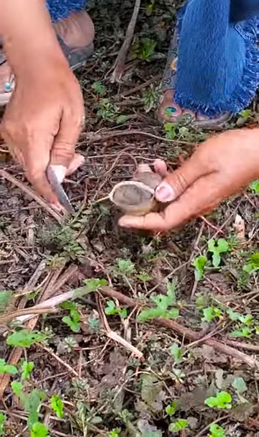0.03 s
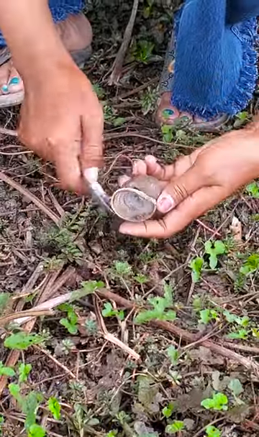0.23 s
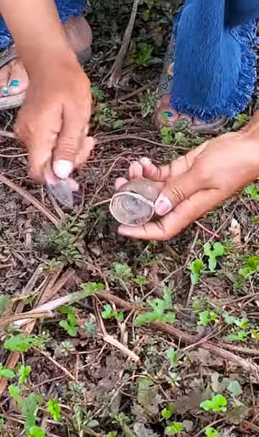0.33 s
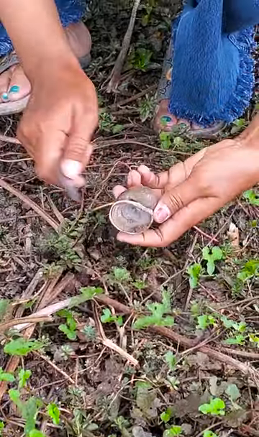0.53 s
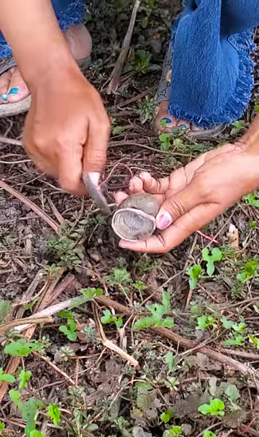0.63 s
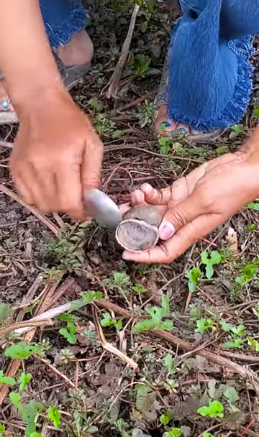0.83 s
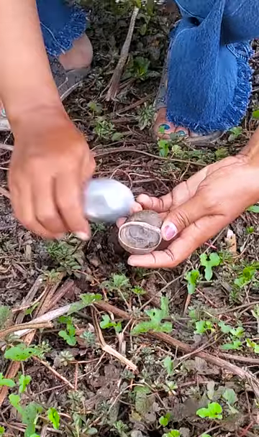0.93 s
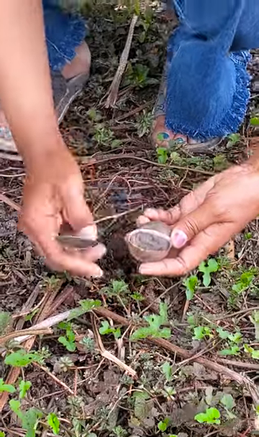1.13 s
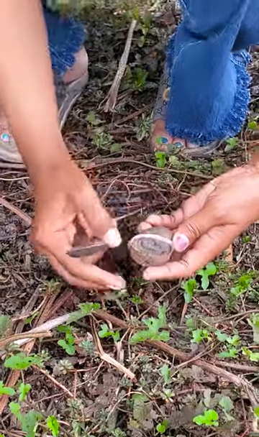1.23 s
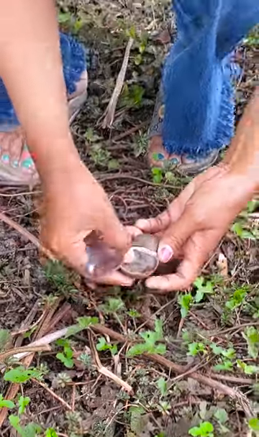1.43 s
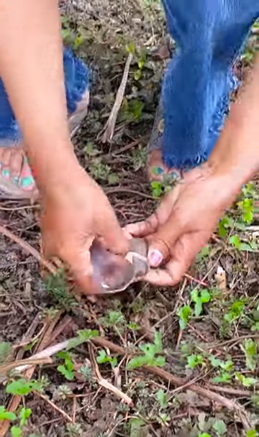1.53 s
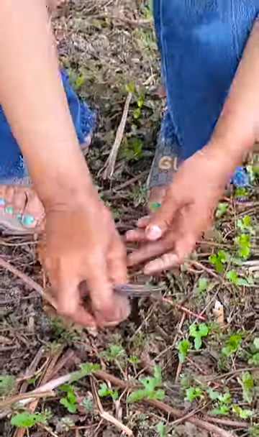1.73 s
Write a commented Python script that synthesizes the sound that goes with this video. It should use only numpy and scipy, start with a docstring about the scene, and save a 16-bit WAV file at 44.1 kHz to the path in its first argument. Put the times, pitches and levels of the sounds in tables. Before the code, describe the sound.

Five quick, dry clicks of a metal spoon on a large snail shell, the last three loudest, some with tiny rebounds. Then come faint finger ticks and light clothing rustle, heard up close outdoors over a quiet rumble.

```python
"""A metal spoon, gripped in the fist, taps a large snail shell held in the other hand, outdoors near the ground.
Five sharp taps, some with light rebounds, ring the shell and the spoon for a few milliseconds.
Behind them: a low rumble, a faint hiss, one far bird and a rustle that grows as the hands move down."""
import sys
import numpy as np
from scipy import signal
from scipy.fft import rfft, irfft
from scipy.io import wavfile
from scipy.ndimage import uniform_filter1d

SR = 44100
rng = np.random.default_rng(int(sys.argv[2]) if len(sys.argv) > 2 else 0)


def unload_wav(signal):
    """Save mono or channel-first audio to the path in sys.argv[1] as 16-bit WAV at rate SR, clipped to [-1, 1]."""
    wavfile.write(
        sys.argv[1],
        SR,
        np.round(np.clip(np.atleast_2d(signal).T, -1, 1) * 32767).astype(np.int16),
    )


N = 79380

# spoon meets shell: (s, level dB, clack Hz, hollow body dB, shell ping dB, spoon clink dB, clink t60 s, treble dB, grit dB, echo delay s)
TAPS = [(0.2336, -23.5, 3630, 6, -24, 1, 0.042, 25.5, 3, .00178), (0.2463, -44.5, 3400, 5, 13, -13, 0.049, 22, 12, .00178),
        (0.2536, -44.5, 5000, 6, 5, 18, 0.061, 26, 7, .00178),
        (0.399, -14, 3480, 8.5, -2.5, 2, 0.053, 10, -1.5, .0014), (0.4078, -27, 3350, 9, -1, -16, 0.051, 9, 2, .0014),
        (0.5822, -3, 3240, 0, 1, 3, 0.025, 3.5, -3.5, 0.0016),
        (0.767, -1.5, 3470, -3, -1.5, 2, 0.014, -2.5, -4.5, .00173), (0.825, -49.5, 3700, -3, -6, 9, .02, 2, -1, .00173),
        (0.9743, -3, 4770, -5.5, -3.5, 8, 0.013, 9, -3, .00141), (1.0233, -43.5, 3900, -21, 14, 10, 0.026, 13, 10, .0011),
        (1.035, -26, 4900, -30, 13.5, 5, .018, 18.5, -6, .0011), (1.0379, -21, 5160, -22, -10, -6, 0.019, 18, -1, .0011)]
# hand-damped shell: (Hz, dB, t60 s, left-right dB)
SHELL = [(700, -28, 0.021, -1.5), (1166, -29.5, 0.005, -7.5), (1663, -19.5, 0.0135, -0.5), (2426, -22, 0.029, 0),
         (2958, -12.5, 0.018, 11), (3382, -13.5, 0.015, -7.5), (3758, -12.5, .011, -6.5)]
# gripped spoon: (Hz, dB, t60 s, left-right dB)
SPOON = [(4830, -21, 0.016, -10.5), (4924, -10.5, 0.018, 0), (5590, -20.5, 0.046, -4), (6570, -19, 0.013, 15.5),
         (7296, -26, .012, 4.5), (7920, -31, 0.019, 15), (9220, -34.5, .011, -10), (11250, -34, 0.024, 0.5),
         (12700, -28, 0.0083, -12), (14040, -38.5, .013, -4.5), (15550, -44, 0.01613, 7)]
BODY_HZ, PING_HZ, CLINK_HZ, MODE_OCTAVES, TREBLE_HZ = 2182, 2955, 4975, 0.064, 8070
# gritty crack of the contact: (Hz, dB per Hz)
GRIT = [(200, -53.5), (420, -48), (600, -20.5), (720, -19.5), (950, -20.5), (1250, -13.5), (1700, -10.5), (2050, -9.5), (2800, -3.5), (3700, -1.5), (5500, -5), (7600, -5), (9000, -23), (12000, -25.5), (15500, -22)]
GRIT_DB, GRIT_T60_S, GRIT_RISE_S = -10, 0.026, 0.00017
SCATTER_DB, SCATTER_T60_S, SCATTER_RISE_S, SCATTER_DULL_HZ = -32.5, 0.099, 0.0027, 7070   # off plants and legs
RIGHT_LAG_S = .000072
# small ticks of fingers and shell: (s, level dB, t60 s)
TICKS = [(1.1495, -47, 0.017), (1.1722, -48.5, 0.014), (1.544, -53, 0.1)]
TICK_COLOUR = [(1000, -31.5), (4000, 2), (7000, 5), (10000, -6), (15500, 6.5)]
# far bird: (s, Hz, dB)
BIRD = [(.452, 5500, -78), (.465, 5100, -61), (.477, 4200, -56), (.492, 4050, -63), (.502, 3350, -71), (.532, 3300, -67), (.542, 2900, -85)]
RUMBLE = [(12, -63.5), (20, -32), (59, -4.5), (80, -2.5), (110, -5.5), (129, -12), (152, -13.5), (173, -22.5), (275, -29.5),
          (400, -44.5), (520, -67), (880, -120)]
RUMBLE_LEVEL = [(0.0, -50.5), (0.194, -48.5), (0.214, -51), (0.586, -54), (0.61, -46), (0.696, -54), (0.732, -46),
                (0.786, -55), (1.118, -52), (1.158, -43.5), (1.218, -63.5), (1.242, -50), (1.634, -54), (1.684, -47.5),
                (1.778, -56.5), (1.8, -46)]   # (s, dB)
AIR = [(200, 5.5), (450, -5), (700, 0.5), (950, -5), (1280, 0.5), (1700, -5.5), (3000, -4), (4500, -11), (7300, -7.5), (8600, -29), (10500, -23.5), (12500, -17.5), (15800, -18.5)]
AIR_DB = -62
RUSTLE = [(250, -4), (700, 0), (1400, 2), (2300, -1.5), (4000, -3.5), (7300, -3), (8600, -25), (13000, -10.5), (15800, -12)]
RUSTLE_LEVEL = [(0, -86), (1.15, -85), (1.37, -65), (1.47, -70.5), (1.58, -63), (1.69, -65), (1.8, -58)]   # (s, dB)
CUTOFF_HZ = 16000   # fixed
T = np.arange(N) / SR
ECHO_DB = -11   # off the ground; its delay changes as the hands move
BIRD_WIDTH_HZ = 850   # fixed
CLACK_DB, CLACK_RISE_S = -2, 0.00051   # the stiff shell wall gives and springs back within a millisecond
CLACK_PAN_DB, CLACK_PAN_HZ = -8.5, 3716   # left-right dB per octave, and the pitch that sits in the middle
# the spoon skids over the shell after the third tap: (s, dB)
SKID_LEVEL = [(.592, -70), (.599, -32), (.606, -41.5), (.611, -44.5), (.621, -52.5), (.634, -78)]
SKID = [(1000, -28), (2000, -15.5), (2450, 0.5), (3900, 0), (4500, -11), (5700, -8.5), (7000, -20), (9000, -32.5), (15500, -33.5)]   # (Hz, dB per Hz)
SKID_ROUGH_DB = 0.5
PEAK_LIMIT = .93   # fixed


def from_db(db):
    """Decibels to gain."""
    return 10 ** (np.asarray(db) / 20)


def curve(rows, column=1):
    """One column of a table, joined by straight lines in time."""
    rows = np.array(rows)
    return np.interp(T, rows[:, 0], rows[:, column])


def noise(spectrum, side_db, size=N, colour=None):
    """Stereo noise of rms 1 with the given spectrum, then tinted by an optional gain per Hz."""
    hz, (knots, db) = np.maximum(np.arange(size // 2 + 1) * SR / size, 1), np.transpose(spectrum)
    gain = from_db(np.interp(np.log(hz), np.log(knots), db)) / np.sqrt((1 + (hz / knots[-1] / 1.2) ** 12) * (1 + (knots[0] / hz / 2) ** 4))  # fixed
    gain = gain / np.sqrt(np.mean(gain ** 2)) * (1 if colour is None else colour(hz))
    mid, side = irfft(rfft(rng.standard_normal((2, size))) * gain, size)
    width = from_db(side_db)
    return (mid + width * side * np.array([[1], [-1]])) / np.sqrt(1 + width ** 2)


def decay(t, t60):
    """Exponential fade."""
    return np.exp(-np.log(1000) * t / t60)


def delay(x, s):
    """One channel, read s seconds late."""
    return np.interp(T - s, T, x, left=0)


def add(out, s, sound):
    """Mix a sound in at time s."""
    start = int(s * SR)
    out[:, start:start + sound.shape[1]] += sound[:, :N - start]


def tap(clack_hz, body_db, ping_db, clink_db, clink_t60, treble_db, grit_db):
    """One contact: a short clack, shell and spoon modes, grit and a faint scatter; a looser grip lets the spoon ring longer."""
    t = T[:SR // 5]  # fixed

    def colour(hz):
        """Gain per Hz for this contact."""
        return from_db(body_db / (1 + (hz / BODY_HZ) ** 10) + treble_db / (1 + (TREBLE_HZ / hz) ** 5))

    def near(hz, centre_hz):
        """1 at a resonance, 0 away from it."""
        return np.exp(-(np.log2(hz / centre_hz) / MODE_OCTAVES) ** 2)
    sides, rise = np.array([[.5], [-.5]]), t / CLACK_RISE_S
    clack = from_db(CLACK_DB + CLACK_PAN_DB * np.log2(clack_hz / CLACK_PAN_HZ) * sides) * (rise * np.exp(1 - rise)) ** 2 * np.sin(2 * np.pi * clack_hz * t)
    ring = 0
    for hz, db, t60, pan_db in SHELL + SPOON:
        clink = near(hz, CLINK_HZ)
        strength = colour(hz) * from_db(db + ping_db * near(hz, PING_HZ) + clink_db * clink + pan_db * sides)
        envelope = (1 - np.exp(-rise ** 2)) * decay(t, t60 + clink * (clink_t60 - t60))
        ring = ring + strength * envelope * np.sin(2 * np.pi * hz * t)
    grit = noise(GRIT, side_db=-4, size=len(t), colour=colour) * decay(t, GRIT_T60_S) * (1 - np.exp(-t / GRIT_RISE_S))
    scatter = noise(GRIT, side_db=-1, size=len(t), colour=lambda hz: colour(hz) / np.hypot(1, hz / SCATTER_DULL_HZ))
    scatter = scatter * decay(t, SCATTER_T60_S) * (1 - np.exp(-t / SCATTER_RISE_S))
    return clack + ring + from_db(GRIT_DB + grit_db) * grit + from_db(SCATTER_DB) * scatter


def spoon_on_shell():
    """All contacts, each with its echo off the ground; they reach the left side first."""
    out = np.zeros((2, N))
    for s, db, *tint, echo_s in TAPS:
        sound = from_db(db) * tap(*tint)
        add(out, s, sound)
        add(out, s + echo_s, from_db(ECHO_DB) * sound)
    return np.array([out[0], delay(out[1], RIGHT_LAG_S)])


def handling():
    """Tiny bright ticks, and the rustle of moving arms and clothes."""
    out, t = from_db(curve(RUSTLE_LEVEL)) * noise(RUSTLE, side_db=-2), T[:SR // 10]
    for s, db, t60 in TICKS:
        add(out, s, from_db(db) * decay(t, t60) * noise(TICK_COLOUR, side_db=0.5, size=len(t)))
    return out


def bird():
    """One faint falling chirp, blurred by distance into a narrow band of noise."""
    blur = signal.sosfilt(signal.butter(2, BIRD_WIDTH_HZ / 2, fs=SR, output="sos"), rng.standard_normal((2, N)))
    phase = 2 * np.pi * np.cumsum(curve(BIRD)) / SR
    chirp = (blur[0] * np.sin(phase) + blur[1] * np.cos(phase)) / (np.sqrt(2) * blur.std())
    return from_db(curve(BIRD, column=2)) * chirp * (T > BIRD[0][0]) * (T < BIRD[-1][0])


def outdoors():
    """Uneven low rumble under a steady soft hiss."""
    return from_db(curve(RUMBLE_LEVEL)) * noise(RUMBLE, side_db=-19.0) + from_db(AIR_DB) * noise(AIR, side_db=2.0)


def skid():
    """A short, soft scrape that catches unevenly on the shell's ridges."""
    catch = uniform_filter1d(rng.standard_normal(N), size=40)
    level_db = curve(SKID_LEVEL) + SKID_ROUGH_DB * catch / catch.std()
    return from_db(level_db) * noise(SKID, side_db=-0.5) * (T > SKID_LEVEL[0][0]) * (T < SKID_LEVEL[-1][0])


def scene():
    """Everything at the microphones."""
    return spoon_on_shell() + skid() + handling() + bird() + outdoors()


def record(dry):
    """Peaks are held just below full scale; the top is cut."""
    return signal.sosfilt(signal.cheby2(14, 60, CUTOFF_HZ + 600, fs=SR, output="sos"), np.clip(dry, -PEAK_LIMIT, PEAK_LIMIT))  # fixed


dry = scene()
out = record(dry)
unload_wav(out)
```